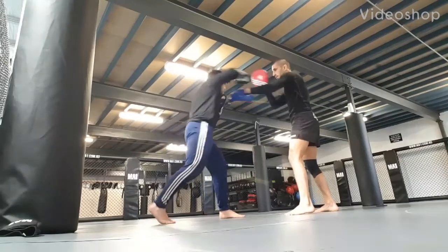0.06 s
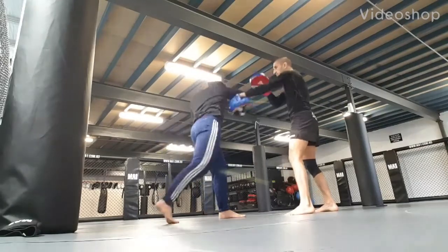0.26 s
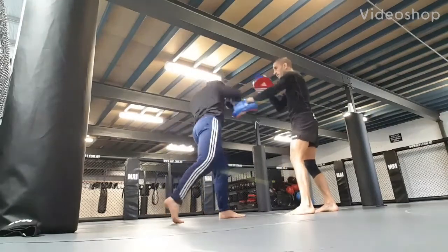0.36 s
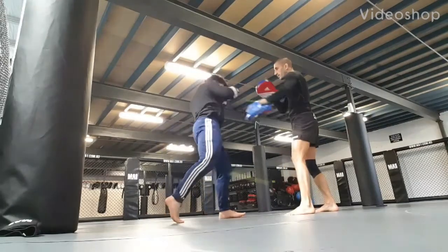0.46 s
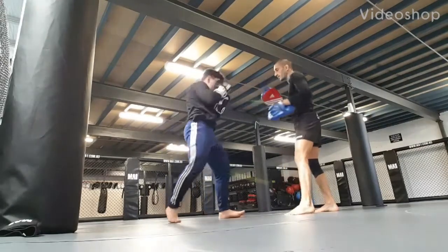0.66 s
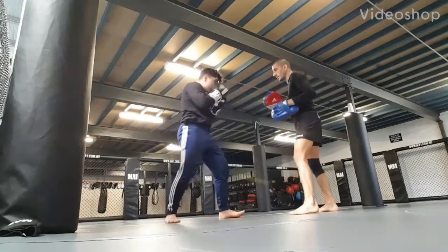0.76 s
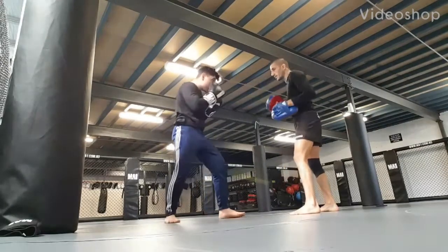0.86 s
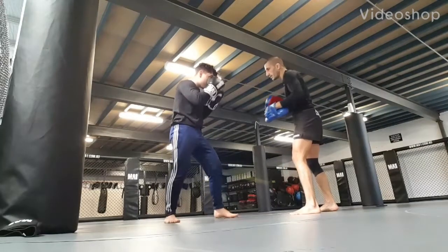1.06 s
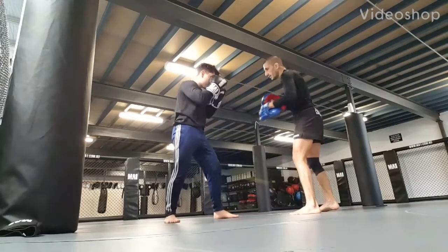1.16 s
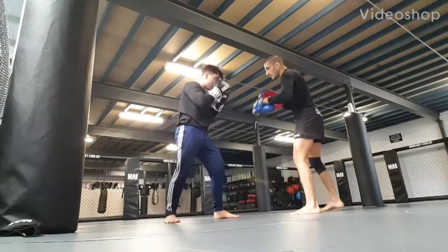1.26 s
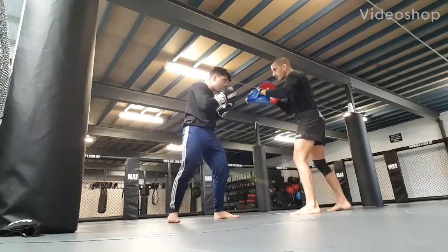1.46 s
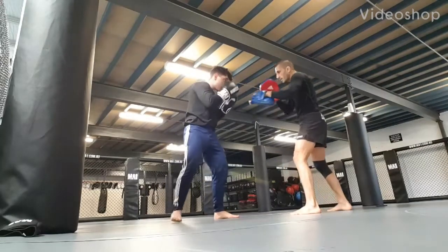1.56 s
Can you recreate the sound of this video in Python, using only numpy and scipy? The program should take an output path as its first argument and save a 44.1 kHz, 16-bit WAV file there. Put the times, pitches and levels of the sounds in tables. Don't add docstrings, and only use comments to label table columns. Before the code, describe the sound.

A gloved punch lands on a padded mitt at about 0.24 seconds, a very loud, dense slap with a short leather crack. Quick echoes, a low boom and about a second of hall ring follow. Quiet bare feet pat the mat before it, again from 0.83 to 1.35, then scuff and peel with small ticks near 1.5. Low gym hum and faint cloth stir; close floor microphone.

```python
import sys
import numpy as np
from scipy import signal
from scipy.fft import rfft, irfft
from scipy.io import wavfile
from scipy.ndimage import uniform_filter1d

SR = 44100
rng = np.random.default_rng(int(sys.argv[2]) if len(sys.argv) > 2 else 0)


def unload_wav(signal):
    wavfile.write(
        sys.argv[1],
        SR,
        np.round(np.clip(np.atleast_2d(signal).T, -1, 1) * 32767).astype(np.int16),
    )


def undo_db(level):
    steps = np.asarray(level, float) / 20
    return 10 ** steps


N = 70560

# [Hz, dB per Hz]
HUM_COLOUR = [(15, -16), (30, -5.5), (90, 2.5), (300, -7), (700, -16), (1300, -20), (1600, -27),
              (3500, -34), (6100, -49.5), (16000, -38.5)]
HUM_DB = -50
# [s, dB]
STIR_LEVEL = [(0, -60), (.12, -62.5), (.24, -67.5), (.85, -68.5), (0.998, -74.5), (1.17, -74), (1.27, -71),
              (1.37, -66), (1.44, -66), (1.54, -59.5), (1.6, -68)]
# [Hz, dB per Hz]
STIR_COLOUR = [(120, -65), (200, -3), (360, -14), (509, -11), (1060, -10.5), (1590, -25.5), (2250, -20.5),
               (16000, -43)]

# [Hz, 0 to 1]
PORT_LIKENESS = [(60, 1), (180, 0.89), (550, 0.62), (1400, 0.1), (3000, 0.059), (15000, 0.024)]
# [Hz, dB]
PORT_LEAN = [(60, 4.5), (240, 1), (950, -0.5), (3770, -3.5), (15000, 0)]

# [Hz, s]
HALL_T60 = [(60, 1), (130, 0.93), (300, 0.64), (700, 0.42), (1400, 0.53), (3500, 0.67), (7000, 0.5),
            (12000, 0.36)]
# [Hz, dB]
HALL_BLOW_COLOUR = [(30, -12), (105, -1), (200, -0.5), (370, 1), (700, -2), (1200, -0.5), (1600, -16.5),
                    (3600, -23), (15500, -34.5)]
# [Hz, dB]
HALL_PAT_COLOUR = [(30, -14), (1200, -1.5), (1800, 8), (16000, 6)]
HALL_BLOW_DB, HALL_PAT_DB = 32, -6
FAR_END_DB, FAR_END_STRETCH = -13, 1.75
LOW_START_S, LOW_RISE_S = .003, .016
TREBLE_HZ, TREBLE_START_S, TREBLE_RISE_S = 1600, .001, .005

# [s, dB, Hz, dB]
FOOT_PATS = [(.004, -35, 556, -37), (.019, -38, 650, -49), (.034, -34.5, 690, -58), (.044, -43, 660, -46),
             (.085, -39, 382, -51), (.175, -39.5, 700, -31), (.832, -36.5, 617, -70), (.846, -39, 751, -56),
             (.91, -45, 650, -47), (1.039, -46, 757, -65), (1.102, -36.5, 653, -41), (1.111, -54, 585, -68),
             (1.2037, -40.5, 635, -34.5), (1.232, -42, 477, -36.5), (1.325, -43, 684, -58),
             (1.337, -43.5, 652, -59), (1.35, -51, 645, -47), (1.216, -41.5, 684, -42),
             (1.267, -44, 527, -35.5), (1.3, -46, 845, -41), (1.523, -53, 430, -34.5),
             (1.542, -41, 405, -37.5)]
PAT_T60_S, PAT_RISE_S = 0.03, 0.0024
THUD_HZ, THUD_T60_S = 179, 0.026
# [s, dB, s, Hz, octaves]
SKIN_SCUFFS = [(0.112, -69, 0.011, 4380, 0.071), (0.191, -61.5, 0.035, 3300, 0.22),
               (0.832, -62, 0.0089, 10400, 0.37), (.833, -61, 0.029, 2500, 0.65),
               (0.859, -63.5, .01, 2900, 0.15), (0.911, -67, 0.037, 2800, 0.33),
               (1.206, -60, 0.013, 8800, 1.4), (1.216, -62.5, 0.012, 3690, 0.16),
               (1.33, -59, 0.0086, 6100, 0.48), (1.346, -63, 0.055, 4250, 1.06),
               (1.472, -57, 0.0094, 3920, 1), (1.488, -62, 0.06, 8200, 0.88),
               (1.506, -59, 0.0066, 7000, 0.86), (1.5205, -50, .005, 2400, 0.61),
               (1.521, -53, .004, 10600, 0.23), (1.533, -55.5, 0.0069, 4000, 1.2)]
# [s, dB, Hz]
TOE_TICKS = [
    (1.4695, -34, 900),
    (1.477, -40, 800),
    (1.487, -38, 900),
    (1.4945, -36, 1050),
    (1.502, -39, 650),
    (1.5208, -34, 700),
    (1.5212, -42, 2500),
    (1.5275, -39, 400),
    (1.574, -39, 1150),
]
TICK_T60_S = .011

# [Hz, dB, s]
STANDING_WAVES = [(63.1, -21, 0.68), (78.47, -24.5, 1), (131.24, -18, .6), (140.3, -16.5, 0.52),
                  (204.8, -25.5, 0.62), (355.8, -20.5, 0.52)]
STANDING_RISE_S = 0.0072
# [s, dB, dB, Hz]
EARLY_ECHOES = [
    (.0061, -15, -13, 14000),
    (.0092, -22, -19, 5000),
    (.0228, -16, -13, 4000),
    (.0295, -12, -13, 700),
    (.039, -16, -16, 2500),
    (.055, -14, -15, 900),
    (.0120, -5, -6, 250),
    (.0141, -6, -4, 3500),
]

PUNCH_S, PUNCH_DB = .24402, .5
# [Hz, dB, s]
PAD_MODES = [
    (300, -2, .0016),
    (930, -6.5, .0013),
    (1550, -14, .0004),
]
# [Hz, dB]
CRACK_COLOUR = [(1500, -32), (2500, -18), (3800, 5.5), (5500, 0.5), (9000, -2.5), (13000, -2), (16000, -15)]
CRACK_DB, CRACK_T60_S = -18, 0.0063


def evened(x):
    return x / np.sqrt(np.mean(x ** 2) + 1e-20)


def read(points, hz):
    f, value = np.transpose(points)
    return np.interp(np.log(hz + 1), np.log(f + 1), value)


def colour(x, tone):
    size = x.shape[-1]
    gain = undo_db(read(tone, np.fft.rfftfreq(size, 1 / SR)))
    return irfft(rfft(x) * gain, size)


def add(mix, s, sound):
    part = mix[..., max(round(s * SR), 0):][..., :sound.shape[-1]]
    part += sound[..., :part.shape[-1]]


def two_ports(x):
    hz = np.fft.rfftfreq(x.shape[1], 1 / SR)
    a, b = rfft(x)
    same = np.clip(read(PORT_LIKENESS, hz), 0, 1)
    lean = undo_db(read(PORT_LEAN, hz) / 2)
    mid = a * np.sqrt(1 + same)
    side = b * np.sqrt(1 - same)
    ports = np.array([(mid + side) * lean, (mid - side) / lean])
    return irfft(ports, x.shape[1]) / np.sqrt(2)


def air():
    hum = undo_db(HUM_DB) * evened(two_ports(colour(rng.standard_normal((2, N)), HUM_COLOUR)))
    flutter = undo_db(1.5 * evened(uniform_filter1d(rng.standard_normal(N), 300)))
    stir = two_ports(colour(rng.standard_normal((2, N)), STIR_COLOUR))
    s, db = np.transpose(STIR_LEVEL)
    stir_level = undo_db(np.interp(np.arange(N) / SR, s, db) + 8)
    return hum + evened(stir * flutter) * stir_level


def hall(x, tone, db):
    size, gap = SR + SR // 2, 12
    taps = np.zeros((2, size))
    at = np.arange(0, size - gap, gap)
    where = at + rng.integers(0, gap, (2, len(at)))
    np.put_along_axis(taps, where, rng.choice([-1., 1.], (2, len(at))), 1)
    hz, t, z = signal.stft(taps, SR, nperseg=1024, noverlap=896)
    fall_db = -60 * t / read(HALL_T60, hz)[:, None]
    decay = np.hypot(undo_db(fall_db), undo_db(FAR_END_DB + fall_db / FAR_END_STRETCH))
    tail = signal.istft(z * decay, SR, nperseg=1024, noverlap=896)[1]
    tail = two_ports(colour(tail[:, :size] / np.linalg.norm(tail[0]), tone))
    t = np.arange(tail.shape[1]) / SR
    low = colour(tail, [(TREBLE_HZ * .8, 0), (TREBLE_HZ * 1.5, -60)])
    low_rise = np.clip((t - LOW_START_S) / LOW_RISE_S, 0, 1)
    treble_rise = np.clip((t - TREBLE_START_S) / TREBLE_RISE_S, 0, 1)
    tail = low * low_rise + (tail - low) * treble_rise
    return undo_db(db) * signal.fftconvolve(x[None], tail, axes=1)[:, :N]


def pats():
    out, t = np.zeros(N), np.arange(round(SR / 10)) / SR
    for s, db, hz, thud_db in FOOT_PATS:
        ring = undo_db(db - 60 * t / PAT_T60_S) * np.sin(2 * np.pi * hz * t)
        thud = undo_db(thud_db - 60 * t / THUD_T60_S) * np.sin(2 * np.pi * THUD_HZ * t)
        add(out, s, -(ring + thud) * np.minimum(t / PAT_RISE_S, 1))
    return out


def scuffs():
    out, t = np.zeros(N), np.arange(round(SR / 10)) / SR
    f = np.fft.rfftfreq(len(t), 1 / SR) + 1
    for s, db, length, hz, spread in SKIN_SCUFFS:
        band = np.exp(-.5 * (np.log2(f / hz) / spread) ** 2)
        puff = evened(irfft(rfft(rng.standard_normal(len(t))) * band, len(t)))
        add(out, s, puff * undo_db(db - 20 * t / length) * np.minimum(t * 1000, 1))
    return out


def ticks():
    out, t = np.zeros(N), np.arange(round(SR / 50)) / SR
    for s, db, hz in TOE_TICKS:
        snap = -undo_db(db - 60 * t / TICK_T60_S) * np.sin(2 * np.pi * hz * t)
        add(out, s, snap * np.minimum(t * 4000, 1))
    return out


def boom():
    t = np.arange(SR) / SR
    ring = sum(-undo_db(db - 60 * t / t60) * np.sin(2 * np.pi * hz * t) for hz, db, t60 in STANDING_WAVES)
    return ring * (1 - np.exp(-t / STANDING_RISE_S))


def add_echoes(mix, blow):
    for delay, left_db, right_db, dull_hz in EARLY_ECHOES:
        soft = signal.lfilter(*signal.butter(1, min(dull_hz, 20000), fs=SR), blow)
        add(mix, PUNCH_S + delay, undo_db(np.array([[left_db], [right_db]])) * soft)


def punch():
    t = np.arange(round(SR / 8)) / SR
    pad = np.zeros(len(t))
    for hz, db, full in PAD_MODES:
        swing = t / full * np.exp(.5 - .5 * (t / full) ** 2)
        pad -= undo_db(db) * swing * np.sin(2 * np.pi * hz * t)
    crack = evened(colour(rng.standard_normal(len(t)), CRACK_COLOUR))
    crack = crack * undo_db(CRACK_DB - 60 * t / CRACK_T60_S)
    return undo_db(PUNCH_DB) * (pad + crack * np.minimum(t * 4000, 1))


def scene():
    blow, steps = punch(), pats() + scuffs() + ticks()
    hit, burst = np.zeros(N), np.zeros(N)
    add(hit, PUNCH_S, blow)
    add(burst, PUNCH_S, np.ones(1))
    out = air() + steps + hall(steps, HALL_PAT_COLOUR, HALL_PAT_DB)
    out = out + hit + hall(burst, HALL_BLOW_COLOUR, HALL_BLOW_DB)
    add(out, PUNCH_S, boom())
    add_echoes(out, blow)
    return out


def top_cut(x):
    return signal.sosfilt(signal.butter(12, 16300, fs=SR, output="sos"), x)


def record(dry):
    ceiling, knee, edge_hz = 1.0, 8, 15950
    held = dry / (1 + abs(dry / ceiling) ** knee) ** (1 / knee)
    held = signal.sosfilt(signal.ellip(8, .3, 70, edge_hz, fs=SR, output="sos"), held)
    return top_cut(held)


dry = scene()
out = record(dry)
unload_wav(out)
```